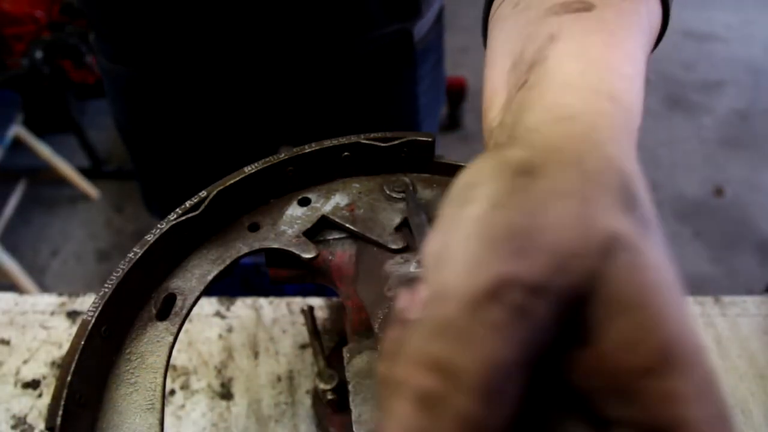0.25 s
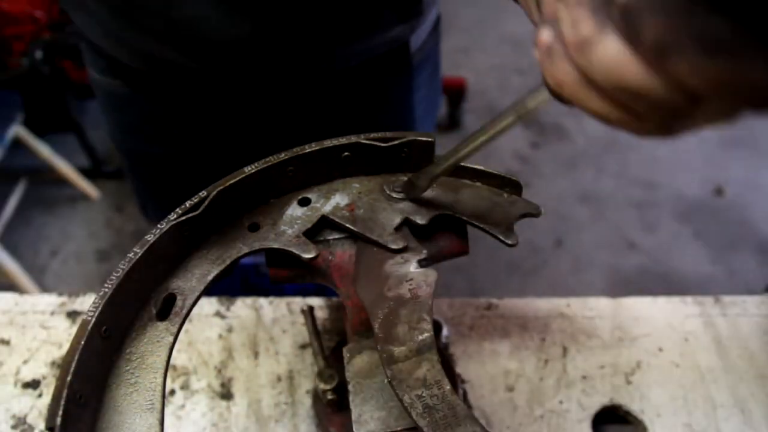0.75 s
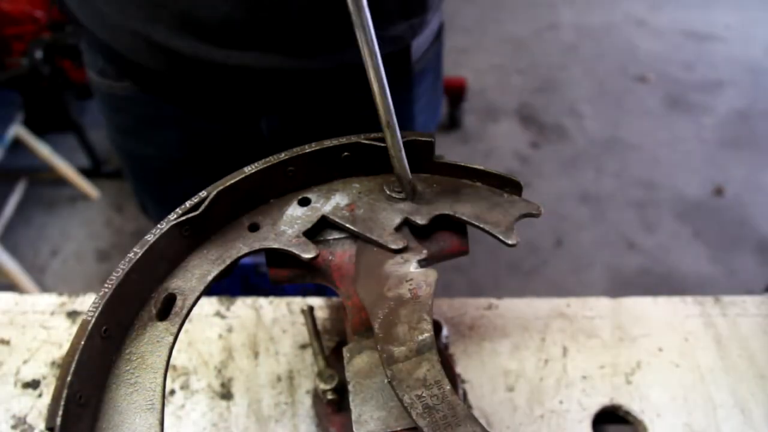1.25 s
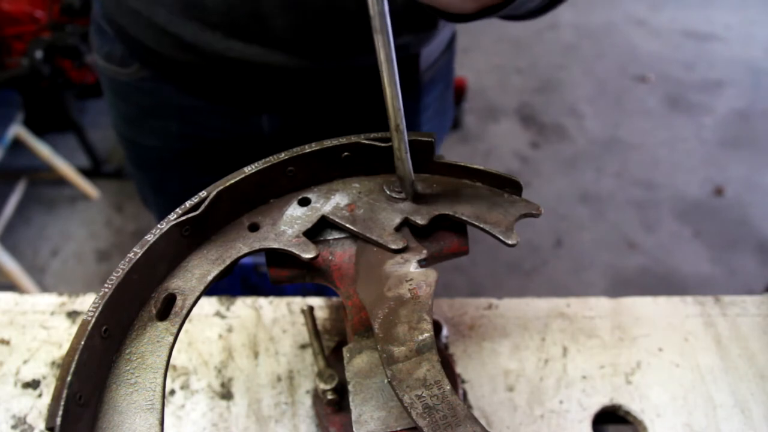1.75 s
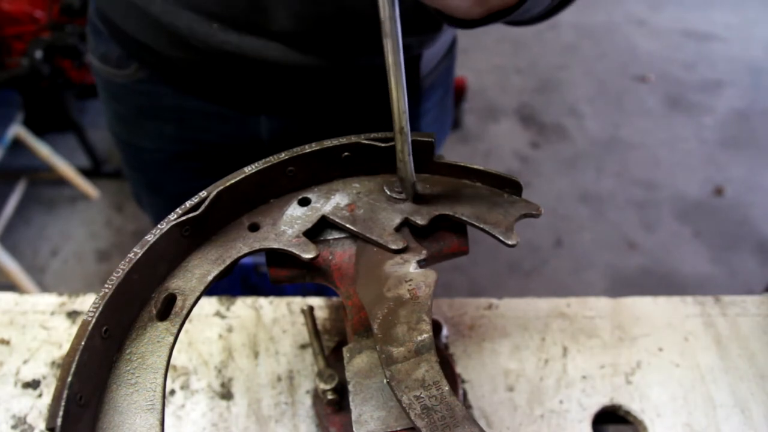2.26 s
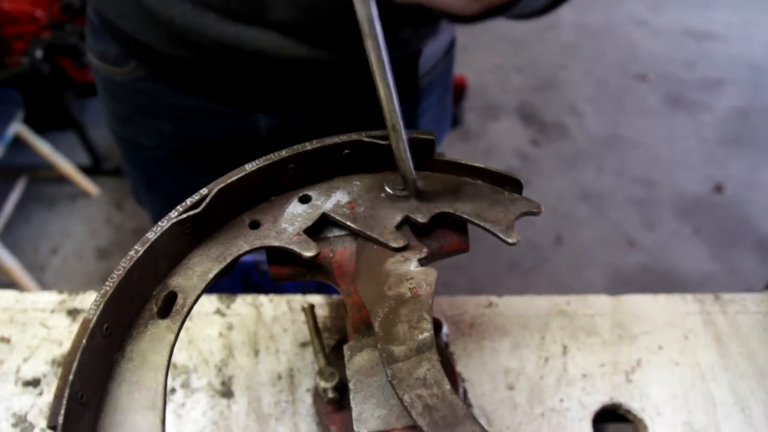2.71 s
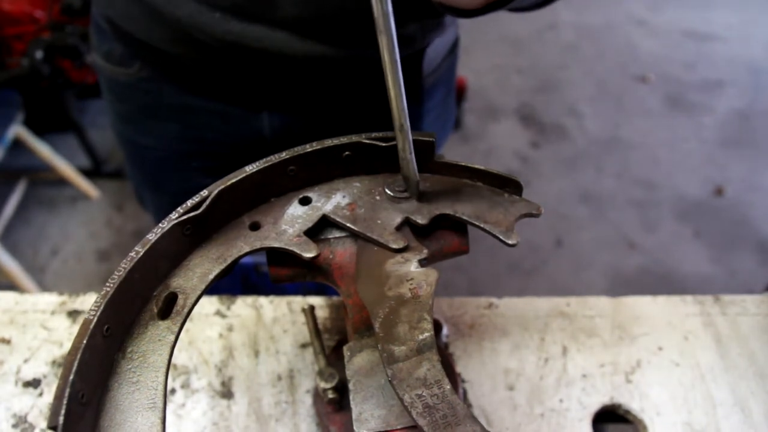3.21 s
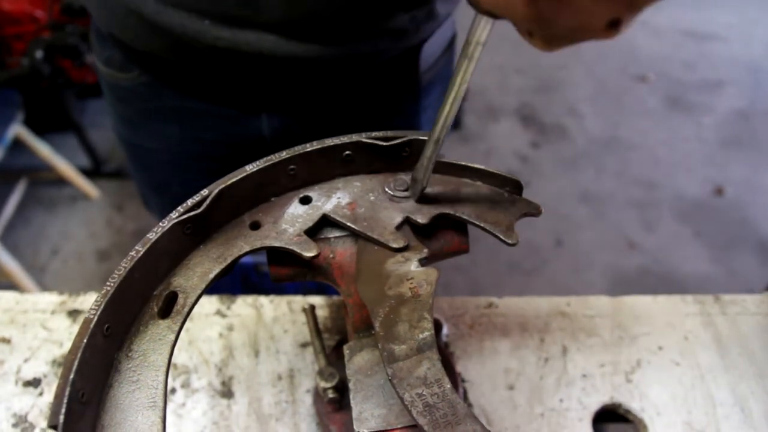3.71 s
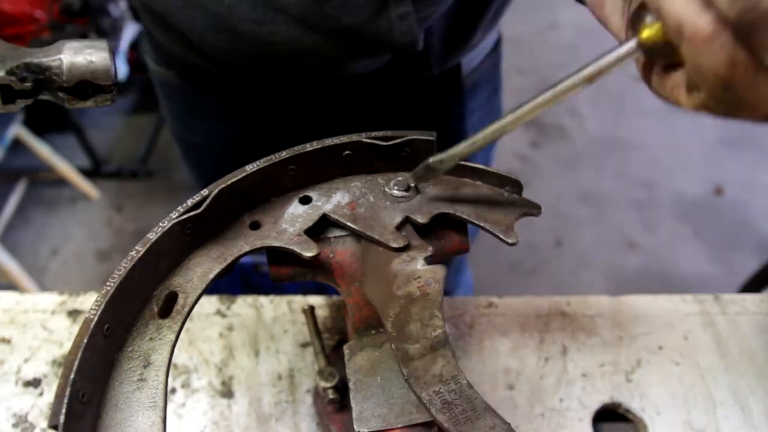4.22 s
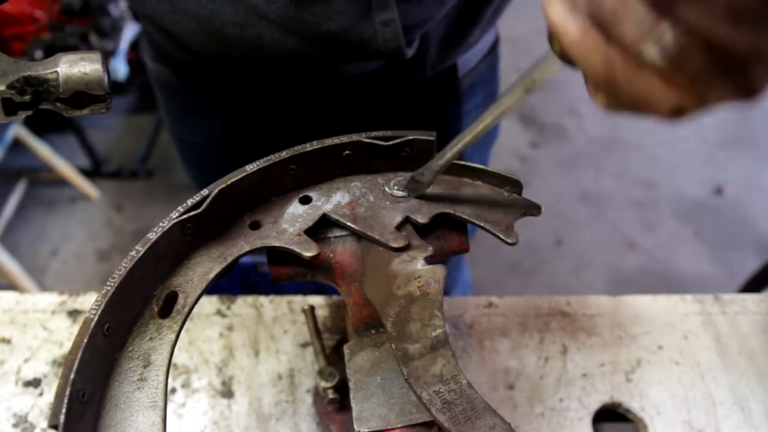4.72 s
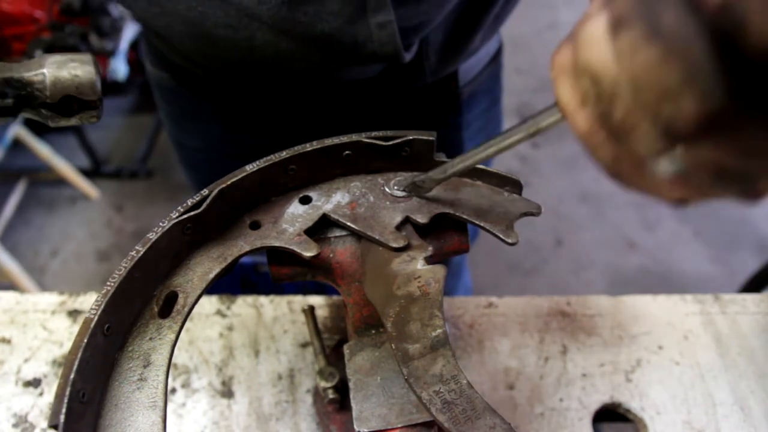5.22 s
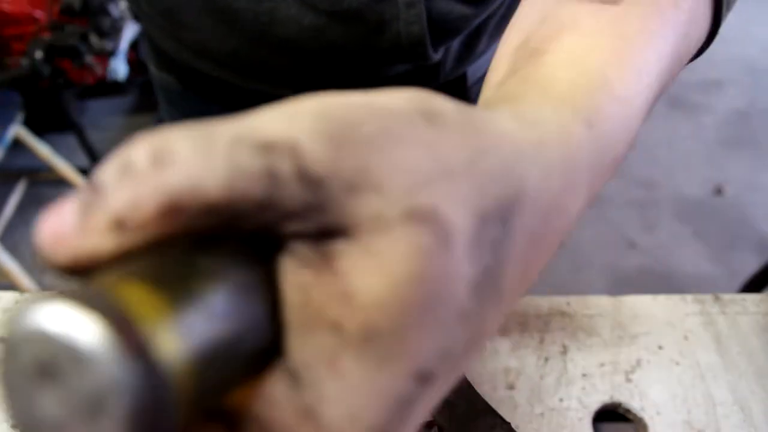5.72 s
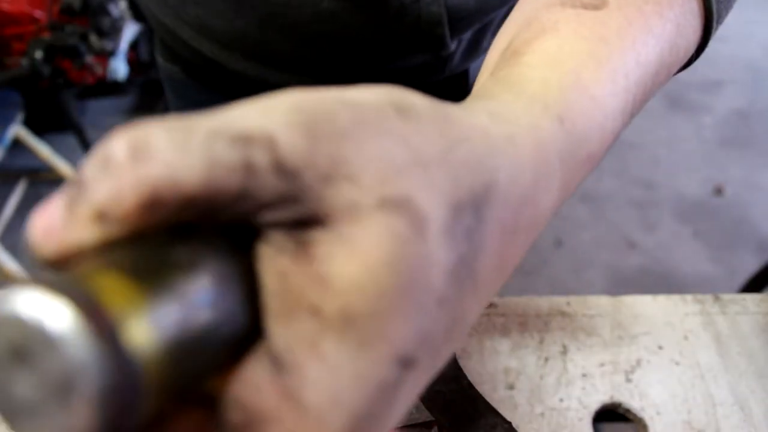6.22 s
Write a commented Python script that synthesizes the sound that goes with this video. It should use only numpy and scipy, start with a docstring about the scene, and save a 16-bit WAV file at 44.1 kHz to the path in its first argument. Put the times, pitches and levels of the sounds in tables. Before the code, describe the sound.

A tool knocks on a workbench right at the start, close to the microphone, in a garage with a steady low drone and a short echo. A screwdriver blade ticks lightly on a steel brake shoe and seats with a clunk at about 1 second. From 1.9 to 3.3 seconds a hammer strikes the screwdriver six times, evenly, between three and four blows a second, growing louder. Each blow is a hard metallic clang with a thin, high ring from the hammer head, slightly overloading the microphone. From about 3.8 to 5.4 seconds the blade clicks, clunks and scrapes softly on the shoe, followed by a few tiny ticks. At about 6.1 and 6.3 seconds a tool hits the bench with two loud clacks, the second ringing brightly. Everything sounds straight ahead, and the room drone comes up in the quieter stretches.

```python
"""A hammer drives a screwdriver against a clip on a brake shoe in a vise: six hard blows, close up.
Each blow sets the shoe clanging and the hammer head singing near 5 kHz, and overloads the microphone.
Before and after, the blade clicks and scrapes on the shoe, and tools knock on the bench.
The place is a garage with a low drone, a short echo and, for a moment, a faint wavering tone.
The work is straight ahead, nearly mono, and the gain comes up in the quiet stretches."""
import sys
import numpy as np
from scipy import signal
from scipy.fft import rfft, irfft, next_fast_len
from scipy.io import wavfile
from scipy.ndimage import uniform_filter1d, map_coordinates

SR = 44100
rng = np.random.default_rng(int(sys.argv[2]) if len(sys.argv) > 2 else 0)


def store_pcm(level_fs):
    """Save levels as 16-bit WAV."""
    pcm = np.round(np.clip(level_fs, -1, 1) * 32767).astype(np.int16)
    wavfile.write(sys.argv[1], SR, np.atleast_2d(pcm).T)


N = 284797
T = np.arange(SR * 3 // 4) / SR  # seconds since a hit

# modes of the brake shoe in the vise: pitch_hz, level_db, base_t60_s
SHOE_MODES = [(196.8, -7.5, 0.24), (247, -5, 0.2), (362.8, -10.5, 0.3), (557, -1.5, 0.18), (610, 0, 0.22),
              (679, -11.5, 0.043), (907, -14.5, 0.39), (1038, -8, 0.033), (1167, -3, 0.18),
              (1270, -17.5, 0.13), (1434, -2, 0.089), (1761, -3.5, 0.12), (2120, -14, 0.074),
              (2605, 0, 0.091), (3200, -18.5, 0.051), (3410, -4, 0.11), (3410, -14, 0.12)]
# decay of the dense ringing after a light hit: frequency_hz, base_t60_s
LIGHT_HIT_DECAY = [(150, 0.6), (500, 0.13), (1000, 0.096), (3000, 0.051), (10000, 0.045)]


def amp(db):
    """Decibels to gain."""
    return 10 ** (np.asarray(db) / 20)


def unit(x):
    """Scale to rms 1."""
    return x / np.sqrt(np.mean(x ** 2) + 1e-20)


def along(points, hz):
    """Read (frequency_hz, value) points on a log frequency axis."""
    point_hz, values = np.transpose(points)
    return np.interp(np.log(hz + 1), np.log(point_hz + 1), values)


def wobble(rate):
    """A smooth random curve, rate knots a second."""
    return map_coordinates(rng.standard_normal(int(N * rate / SR) + 4), [np.arange(N) * rate / SR])


def add(track, start_s, sound):
    """Mix a sound into the track."""
    start = max(round(start_s * SR), 0)
    track[start:start + len(sound)] += sound[:N - start]


def noise(spectrum, size, touch=((1, 0), (2, 0))):
    """Coloured noise of rms 1, then recoloured by the (frequency_hz, gain_db) points of touch."""
    padded = next_fast_len(size)
    hz = np.fft.rfftfreq(padded, 1 / SR)
    colour = unit(amp(along(spectrum, hz))) * amp(along(touch, hz))
    return irfft(rfft(rng.standard_normal(padded)) * colour, padded)[:size]


def dying(x, decay, stretch=1):
    """Each frequency of x fades at its own speed; stretch multiplies the decay times."""
    hz, t, bands = signal.stft(x, SR, nperseg=256)
    fade = amp(-60 * t / (stretch * along(decay, hz)[:, None]))
    return signal.istft(bands * fade, SR, nperseg=256)[1][:len(x)]


def ping(hz, t60_s):
    """One struck mode: a sine that falls 60 dB in t60_s."""
    return np.sin(2 * np.pi * hz * T) * amp(-60 * T / t60_s)


def ring(modes, touch, stretch=1):
    """Struck modes, their strengths new with each hit; each takes a few cycles to build up."""
    hz, db, t60_s = np.transpose(modes)[:, :, None]
    strength = amp(db + along(touch, hz) + 2 * rng.standard_normal(hz.shape))
    phase = 2 * np.pi * (hz * T + rng.random(hz.shape))
    envelope = amp(-60 * T / (stretch * t60_s)) * (1 - np.exp(-T * hz / 2))
    return np.sum(strength * np.sin(phase) * envelope, axis=0)


def press(x, rise_s):
    """A light contact takes a moment to build up its force."""
    return x * (1 - np.exp(-(T / rise_s) ** 2))


def swell(length_s):
    """An envelope that builds, peaks early and eases off."""
    progress = np.linspace(0, 1, int(length_s * SR))
    return np.abs(np.sin(np.pi * progress ** 0.57)) ** 1.63


def background():
    """A steady low room drone, almost alike in both channels, and each channel's own thin hiss."""
    # spectra of the room and of the hiss: frequency_hz, density_db
    drone_spectrum = [(15, -32), (25, -3.5), (165, -1), (200, -10), (234, -5.5), (350, -14), (393, -12.5),
                      (818, -11), (1320, -16), (1430, -19.5), (1700, -25), (1840, -34.5), (2500, -26.5),
                      (3250, -69.5), (5500, -120)]
    hiss_spectrum = [(900, -12.5), (1700, -8), (3000, -2.5), (6000, -5), (10000, -5), (15500, -4.5),
                     (16200, -32.5)]
    spread = amp(-21.5) * noise(drone_spectrum, N)
    drone = noise(drone_spectrum, N) + np.array([spread, -spread])
    hiss = np.array([noise(hiss_spectrum, N), noise(hiss_spectrum, N)])
    return amp(-63 + 0.4 * wobble(24)) * drone + amp(-74.5) * hiss


def in_garage(hit, wet_db):
    """A hit with its diffuse tail, which takes the hit's broad colour and swells as the walls answer."""
    # colour of the echo: frequency_hz, level_db
    wall_spectrum = [(60, -12.5), (300, 3), (1000, 4), (3000, -3), (6000, 0), (14000, -7)]
    # reverberation time: frequency_hz, t60_s
    wall_decay = [(100, 0.62), (400, 0.44), (1200, 0.52), (3300, 0.46), (6000, 0.38), (12000, 0.22)]
    colour = np.sqrt(np.abs(uniform_filter1d(np.abs(rfft(hit)) ** 2, size=70)))
    walls = noise(wall_spectrum, len(T))
    tail = dying(irfft(rfft(walls) * colour, len(T)), wall_decay)
    tail /= np.linalg.norm(dying(walls, wall_decay))
    return hit + amp(wet_db) * tail * (1 - np.exp(-T / 0.0033))


def faint_tones():
    """A faint, wavering tone in the room rises near 1.7 kHz; later a thin squeak falls near 12 kHz."""
    # gliding tones: start_s, length_s, first_hz, last_hz, level_db
    tones = [(1.38, 0.61, 1610, 1806, -68.5), (4.53, 0.22, 12900, 11900, -82)]
    out = np.zeros(N)
    for start_s, length_s, first_hz, last_hz, level_db in tones:
        envelope = swell(length_s)
        hz = np.linspace(first_hz, last_hz, len(envelope)) + 90 * wobble(400)[:len(envelope)]
        add(out, start_s, amp(level_db) * envelope * np.sin(2 * np.pi * np.cumsum(hz) / SR))
    return out


def scrapes_and_tails():
    """Uneven swells of noise: the blade's scrapes, a hit's fading ring and the low echo of a clunk."""
    # the ring is at 0 s, the echo at 0.965 s, the rest are scrapes: start_s, length_s, rasp_db, groan_db
    swells = [(0, 0.12, -54, -52.5), (0.837, 0.14, -73, -55), (0.965, 0.26, -92, -63),
              (3.96, 0.12, -68, -70), (4.264, 0.89, -60.5, -68.5)]
    # spectra of the bright rasp and the low groan: frequency_hz, density_db
    rasp_spectrum = [(400, -6), (950, 2.5), (1700, -8.5), (2500, -3), (3600, -9), (5800, -14), (7500, -27),
                     (12500, -27.5), (16000, -37.5)]
    groan_spectrum = [(300, -18), (700, -4), (930, 1), (1100, -2), (1600, -20.5), (4000, -45), (9000, -53)]
    rasp, groan = np.zeros(N), np.zeros(N)
    for start_s, length_s, rasp_db, groan_db in swells:
        add(rasp, start_s, amp(rasp_db) * swell(length_s))
        add(groan, start_s, amp(groan_db) * swell(length_s))
    flutter = amp(1.5 * wobble(36))
    return flutter * (rasp * noise(rasp_spectrum, N) + groan * noise(groan_spectrum, N))


def tool_ticks():
    """As the tools are lifted away, steel brushes steel too lightly to ring the shoe."""
    # dry ticks: start_s, level_db
    ticks = [(5.496, -55.5), (5.51, -54), (5.608, -50.5)]
    # spectrum of a tick: frequency_hz, density_db
    tick_spectrum = [(1000, -22), (3000, -3), (5200, 7), (6500, -8), (9000, -16), (15000, -27)]
    out = np.zeros(N)
    for start_s, level_db in ticks:
        tick = noise(tick_spectrum, len(T)) * np.exp(-T / 0.0027)
        add(out, start_s, amp(level_db) * press(tick, rise_s=0.00072))
    return out


def hammer_ring(beat_hz, pitch_hz=5051):
    """Two close modes of the head start opposed and beat: the ring swells, and the lower one sings on."""
    lower = ping(pitch_hz - beat_hz / 2, t60_s=0.5)
    upper = ping(pitch_hz + beat_hz / 2, t60_s=0.26)
    return upper - amp(-10.5) * lower


def bench_knocks():
    """A tool hits the bench top, which clacks and then wobbles slowly under it."""
    # knocks: start_s, level_db, sway_db, clack_db, edge_db, hammer_ring_db
    knocks = [(.123, -18.5, -42, 8, -22.5, -49.5), (6.087, -4, -35.5, -4.5, -11, -37.5),
              (6.333, 1.5, -21.5, -4, -7, -11)]
    # modes of the bench top: pitch_hz, level_db, t60_s
    bench_modes = [(132.5, -22.5, 0.47), (215.4, -3, 0.2), (569.5, -8.5, 0.2), (863, 8, 0.065),
                   (964.5, 3.5, 0.093), (1214, -13, 0.14), (1670, -24, 0.22), (2150, 0, 0.072),
                   (2634, -3, 0.08), (3438, 3.5, 0.03), (3672, 3, 0.021)]
    # its dense ringing and its low wobble: frequency_hz, density_db
    clack_spectrum = [(60, -20), (200, -22.5), (400, -15.5), (950, 4), (1400, -4.5), (2400, -1), (3600, 0),
                      (4500, -6), (8000, -7.5), (15000, -13)]
    sway_spectrum = [(15, -12.0), (50, 2), (105, 3.5), (200, -7), (400, -14.5), (1500, -80)]
    sway_age = T / 0.034  # the wobble peaks 34 ms after the hit
    out = np.zeros(N)
    for start_s, level_db, sway_db, clack_db, edge_db, hammer_ring_db in knocks:
        touch = [(900, clack_db), (2500, 0), (3550, 2), (4800, 0), (8000, edge_db)]
        dense = dying(noise(clack_spectrum, len(T), touch), LIGHT_HIT_DECAY, stretch=0.68)
        clack = amp(-1.5) * dense + amp(-15) * ring(bench_modes, touch)
        sway = noise(sway_spectrum, len(T)) * (sway_age * np.exp(1 - sway_age)) ** 2
        knock = in_garage(amp(level_db) * press(clack, rise_s=0.0011), wet_db=-18.5)
        add(out, start_s, knock + amp(sway_db) * sway + amp(hammer_ring_db) * hammer_ring(beat_hz=4.8))
    return out


def blade_contacts():
    # the blade meets the shoe, and its seat sets the pitch:
    # start_s, level_db, thud_db, clunk_db, clunk_hz, tick_hz, edge_db, snap_db
    contacts = [(.424, -62.5, -2, -12, 880, 1650, -8, 6), (0.528, -64, 2, -6, 890, 2150, -3, 14),
                (0.853, -64, 6, 6, 940, 2160, -15, -12), (0.947, -33, 0.5, 7.5, 1038, 3570, -1.5, 10),
                (1.014, -58, 6, 15, 1034, 2220, -24, -24), (3.821, -41.5, -1, -5, 564, 1630, -9, -15),
                (4.008, -57, 5.5, 7, 867, 1706, -17, -8), (4.408, -38.5, 4.5, -5, 810, 3260, 1, 2),
                (4.428, -34, 3, 8.5, 869, 3390, -14, 0), (4.604, -70.5, 27, 28.5, 575, 1770, -10, -12),
                (4.787, -51, 17.5, 6, 730, 3330, -18, -6), (5.253, -29, -4.5, 1.5, 783, 2194, -13.5, -4),
                (5.376, -44.5, 10, 4, 886, 2250, -7, 0)]
    # the dense ringing and the blade's first crack on the shoe: frequency_hz, density_db
    click_spectrum = [(60, -15.5), (200, -8.5), (420, -17.5), (850, 9), (1500, -4), (3400, -4), (4400, -16),
                      (7000, -22), (15000, -33)]
    snap_spectrum = [(500, -29.5), (1200, 5), (3500, 0), (5200, -4), (7000, -25), (14000, -33)]
    out = np.zeros(N)
    for start_s, level_db, thud_db, clunk_db, clunk_hz, tick_hz, edge_db, snap_db in contacts:
        touch = [(250, thud_db), (800, clunk_db / 2), (2000, 0.0026), (6000, edge_db)]
        dense = dying(noise(click_spectrum, len(T), touch), LIGHT_HIT_DECAY)
        steel = amp(-0.5) * dense + amp(-8.5) * ring(SHOE_MODES, touch, stretch=0.69)
        tick = amp(-0.5 + 0.18 * edge_db) * ping(tick_hz, t60_s=0.041)  # a sharper edge ticks louder
        clunk = amp(clunk_db) * ping(clunk_hz, t60_s=0.095) * (1 - np.exp(-T / 0.01))
        snap = amp(snap_db) * noise(snap_spectrum, len(T)) * np.exp(-T / 0.0012)
        contact = press(snap + tick + steel + clunk, rise_s=0.00033)
        add(out, start_s, in_garage(amp(level_db) * contact, wet_db=-20))
    return out


def hammer_blows():
    """Each blow passes down the screwdriver and shakes shoe, vise and bench."""
    # blows: start_s, level_db, floor_rumble_db, clang_db, decay_factor, hammer_ring_db
    blows = [(1.892, -12, -5.5, -7, 0.85, -13.5), (2.166, -10.5, -5.5, -7.5, 1.05, -8.5),
             (2.454, -9.5, 0.5, -6, 1.21, -15.5), (2.739, -8.5, 0, -6.5, 1.14, -17),
             (3.019, -8, 4, -4, 1.01, -15.5), (3.295, -4, 2, -0.5, 0.88, -23)]
    # dense high-order ringing of the steel: frequency_hz, density_db
    clang_spectrum = [(30, 13.5), (90, -6.5), (230, 0), (600, 3.5), (1100, 2), (1900, -2), (2700, 2.5),
                      (3600, -3), (4600, -9.5), (7000, -16.5), (11000, -18.5), (16000, -24.5)]
    # its decay: frequency_hz, base_t60_s
    clang_decay = [(60, 0.39), (250, 0.092), (900, 0.22), (2500, 0.056), (6000, 0.069), (14000, 0.046)]
    out = np.zeros(N)
    for start_s, level_db, floor_rumble_db, clang_db, decay_factor, hammer_ring_db in blows:
        thud_db = -1 - 0.7 * clang_db  # what does not set the shoe clanging thuds into the bench
        touch = [(15, -33.5), (50, floor_rumble_db - 4.5), (90, floor_rumble_db + 3.5),
                 (220, thud_db), (1100, clang_db), (3000, 3.5)]
        dense = dying(noise(clang_spectrum, len(T), touch), clang_decay, decay_factor)
        steel = dense + amp(-14) * ring(SHOE_MODES, touch, decay_factor)
        blow = in_garage(amp(level_db + 6.5) * steel, wet_db=-15)
        add(out, start_s, blow + amp(hammer_ring_db) * hammer_ring(beat_hz=10.5))
    return out


def scene():
    """The work is straight ahead of the microphone, so both channels hear it alike."""
    hits = hammer_blows() + blade_contacts() + tool_ticks() + bench_knocks()
    return hits + scrapes_and_tails() + faint_tones() + background()


def record(dry):
    """The close microphone clips on hard hits, quiet stretches are turned up, and the band ends steeply."""
    # gain rides between the loud hits: rise_start_s, rise_end_s, fall_start_s, fall_end_s
    rides = [(0.367, 0.43, 1.414, 1.654), (3.45, 3.76, 5.66, 6.228)]
    ceiling, hardness, lift_db, top_hz = 0.31, 6, 15, 15950
    clipped = dry / (1 + np.abs(dry / ceiling) ** hardness) ** (1 / hardness)
    fader = sum(np.interp(np.arange(N) / SR, times, [0, 1, 1, 0]) for times in rides)
    lifted = clipped * (1 + (amp(lift_db) - 1) * fader)
    padded = next_fast_len(N + SR // 2)
    hz = np.fft.rfftfreq(padded, 1 / SR)
    return irfft(rfft(lifted, padded) / (1 + (hz / top_hz) ** 120), padded)[:, :N]


dry = scene()
out = record(dry)
store_pcm(out)
```